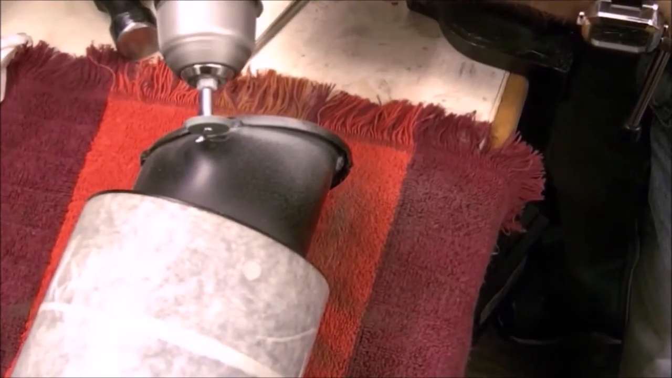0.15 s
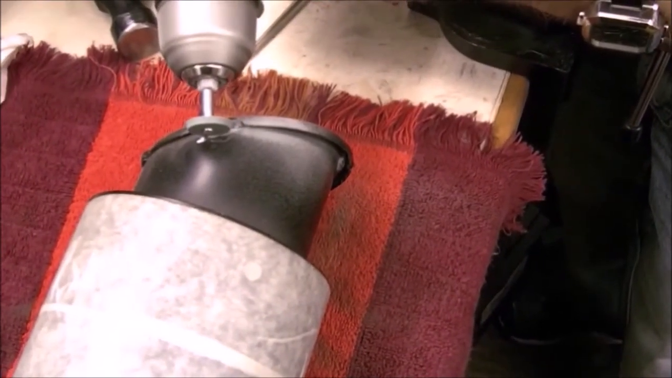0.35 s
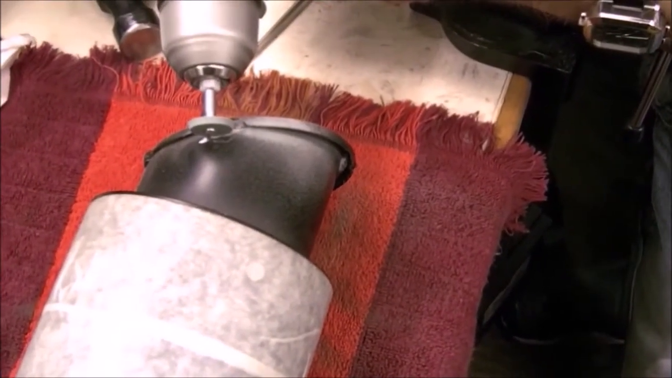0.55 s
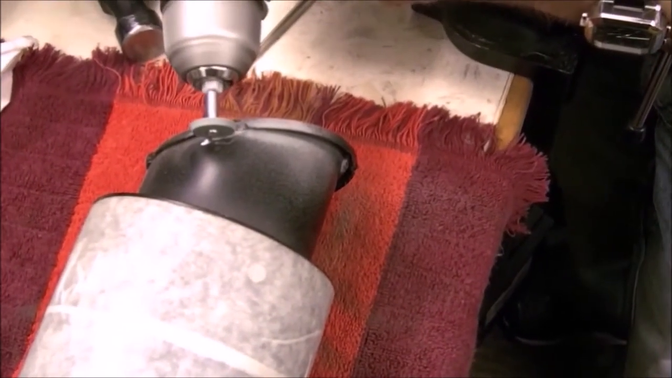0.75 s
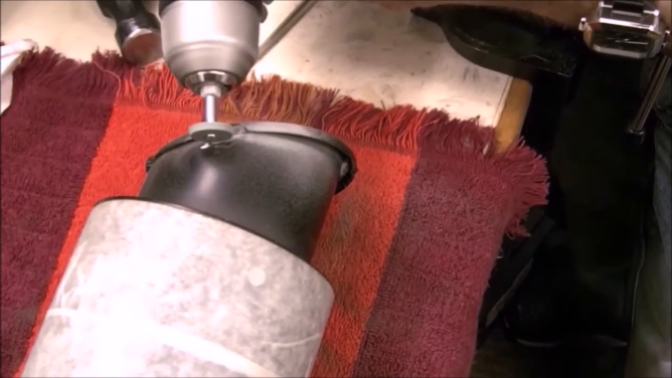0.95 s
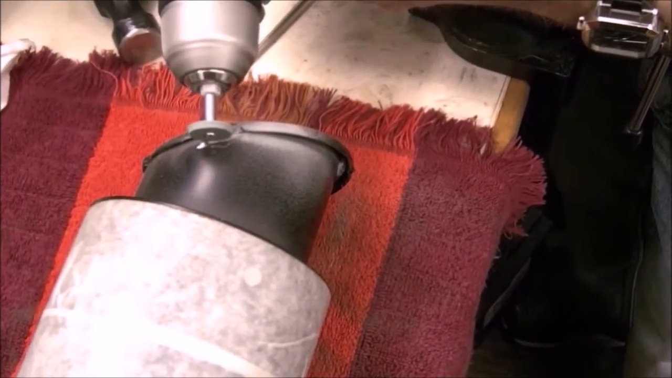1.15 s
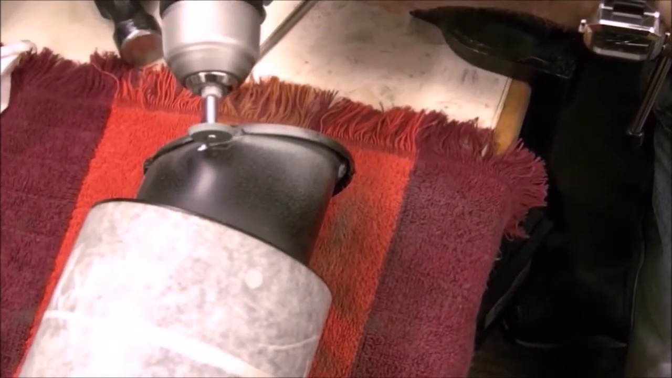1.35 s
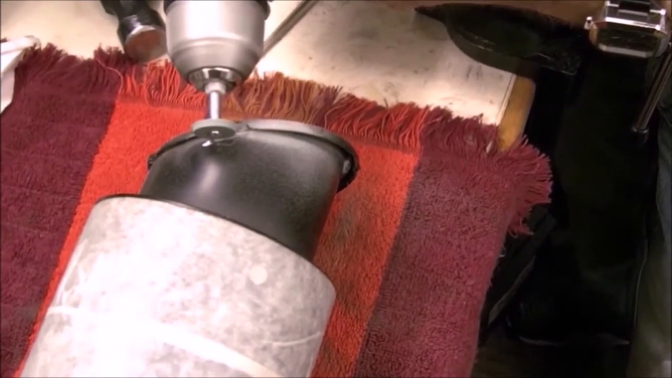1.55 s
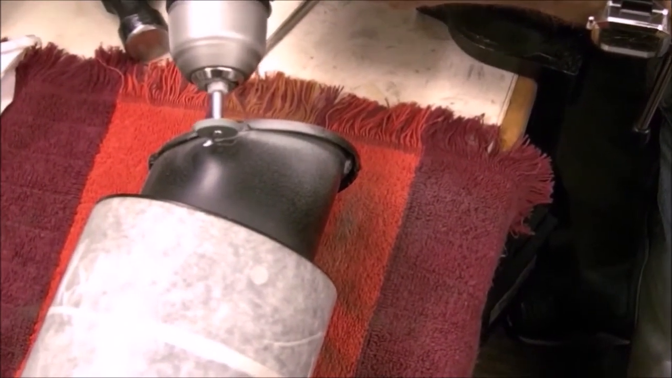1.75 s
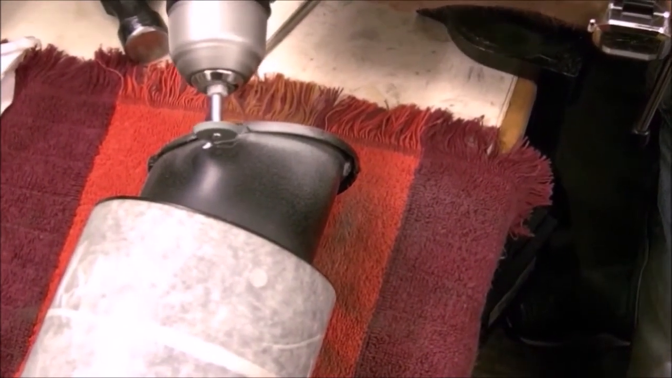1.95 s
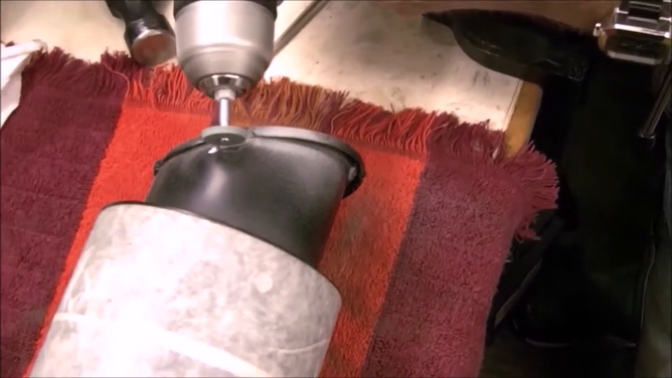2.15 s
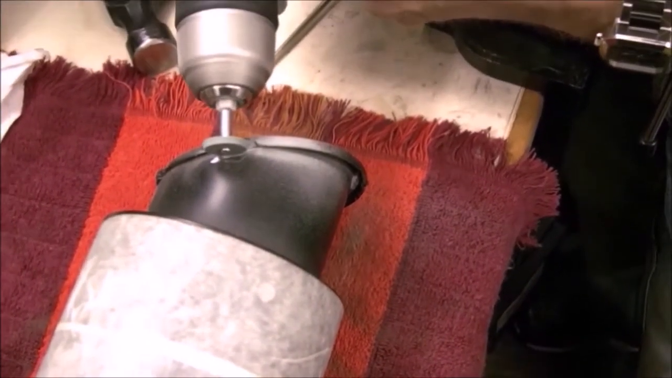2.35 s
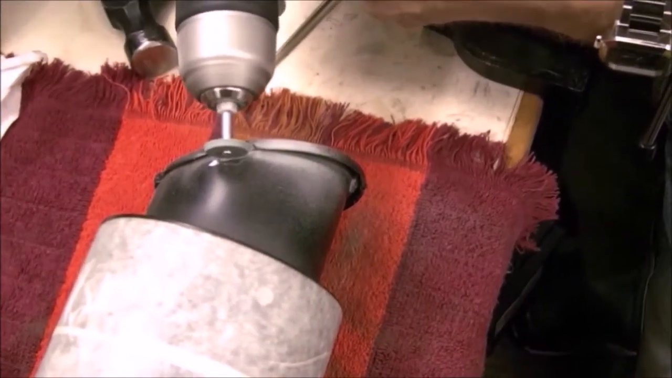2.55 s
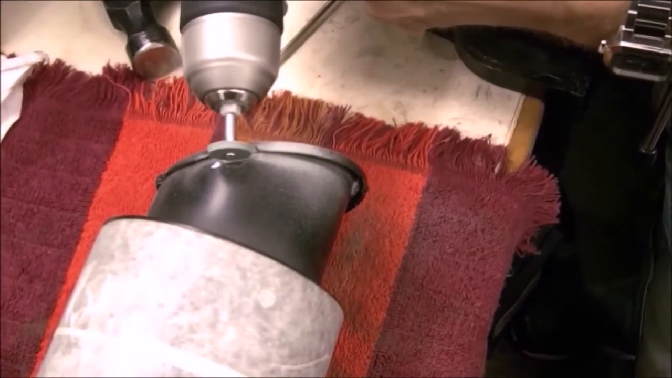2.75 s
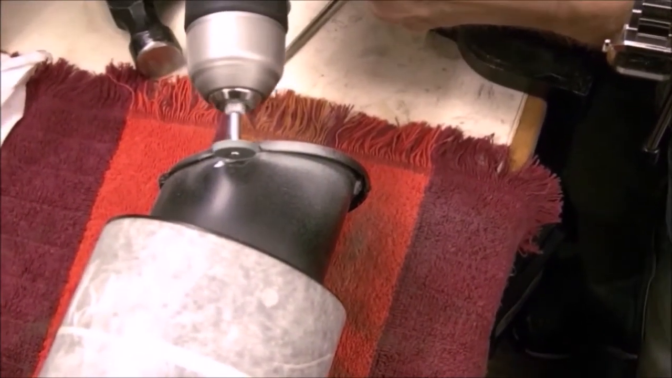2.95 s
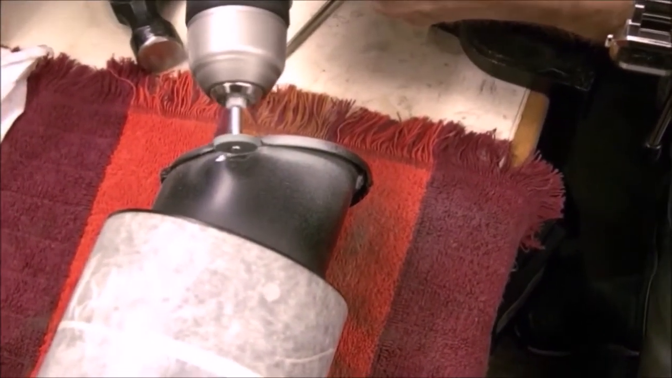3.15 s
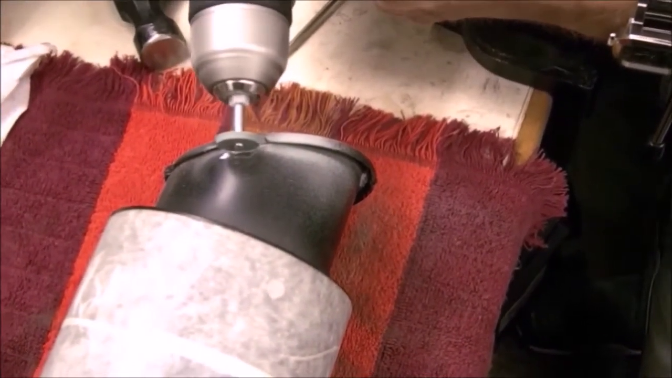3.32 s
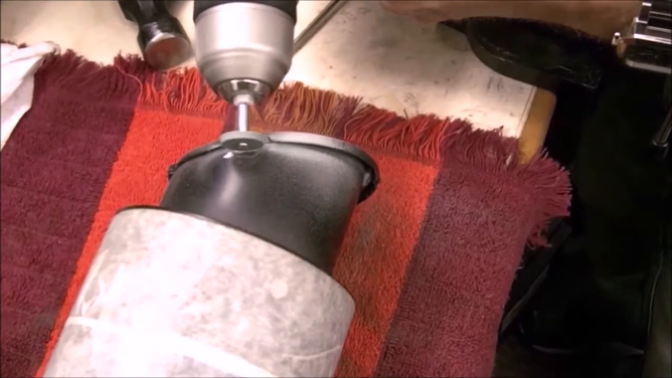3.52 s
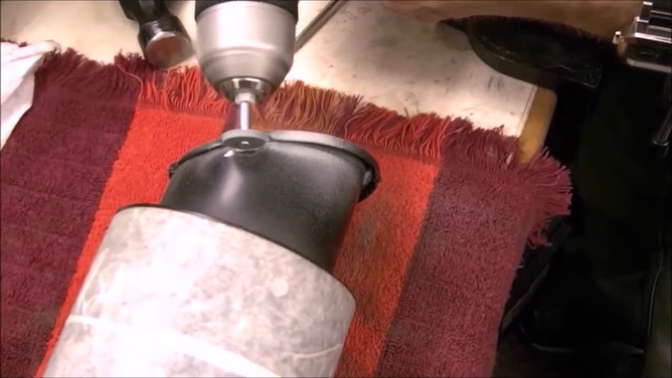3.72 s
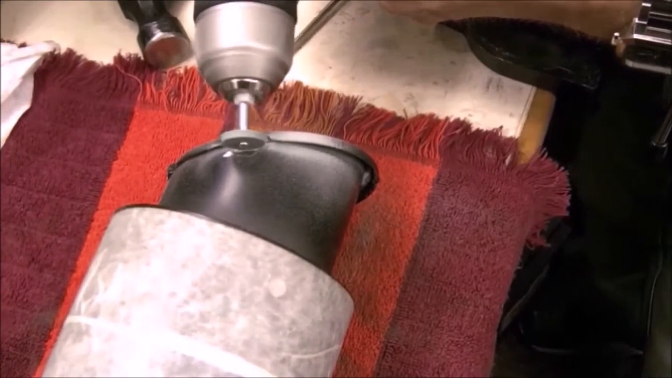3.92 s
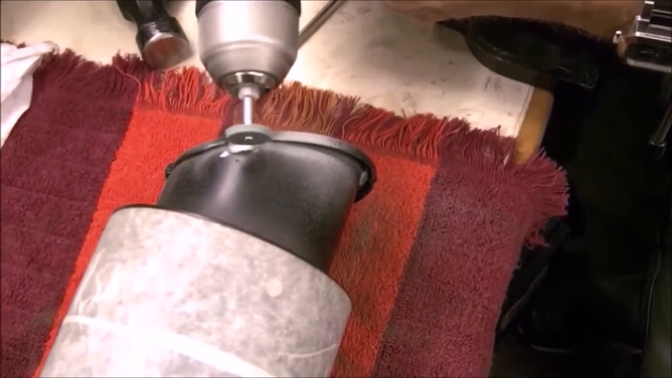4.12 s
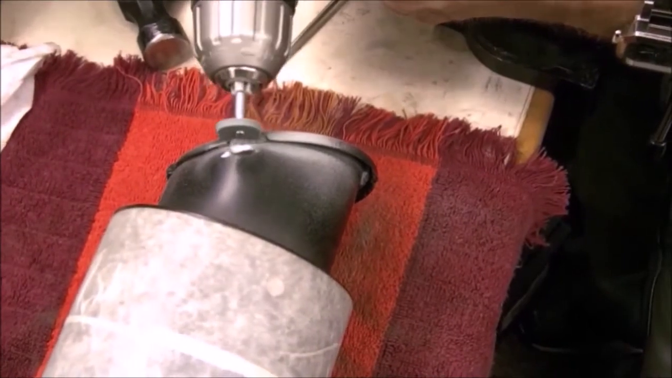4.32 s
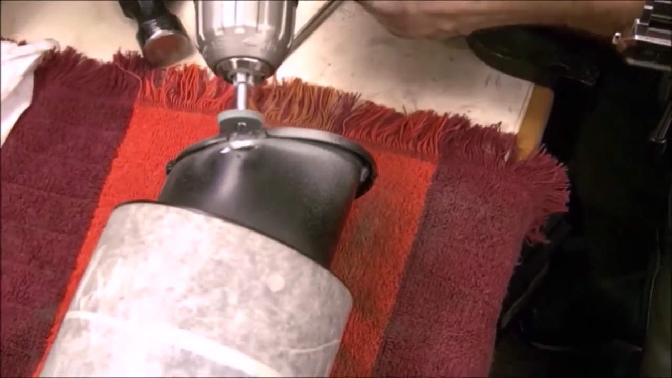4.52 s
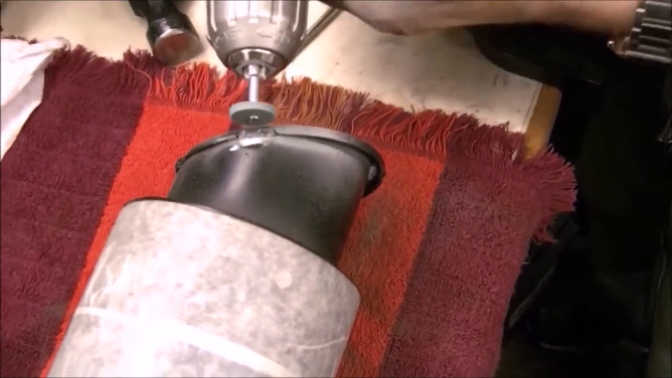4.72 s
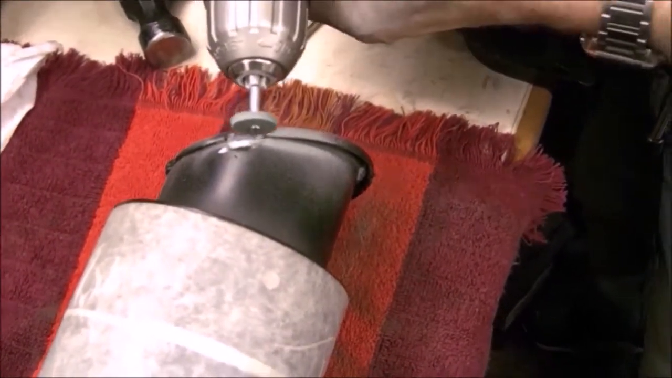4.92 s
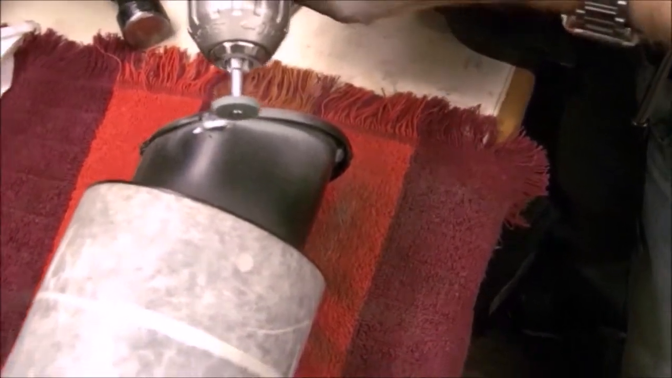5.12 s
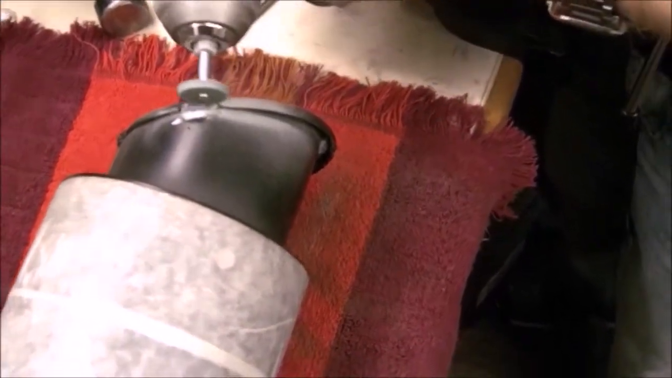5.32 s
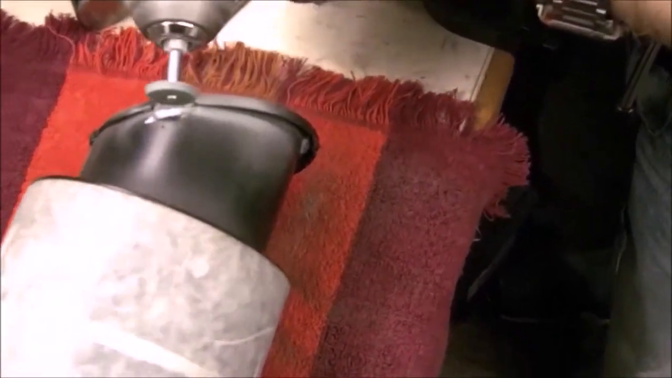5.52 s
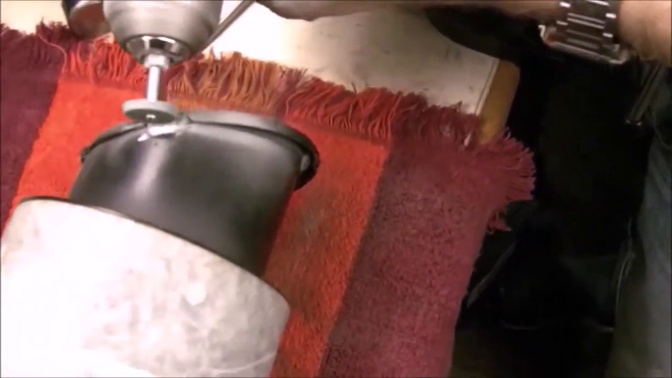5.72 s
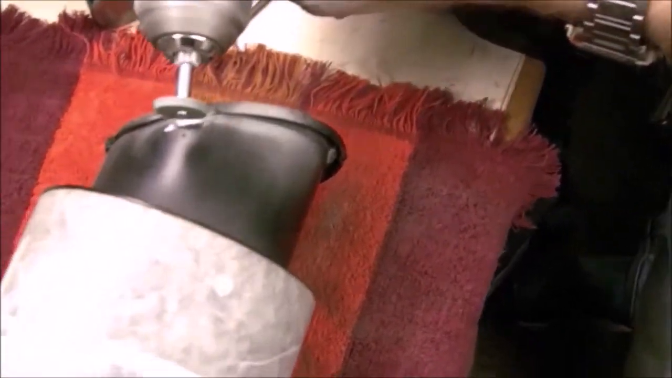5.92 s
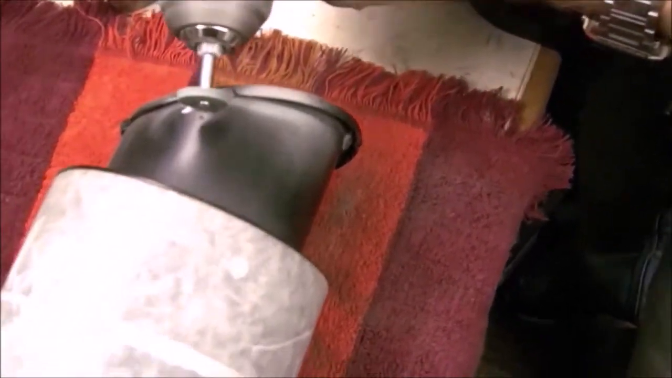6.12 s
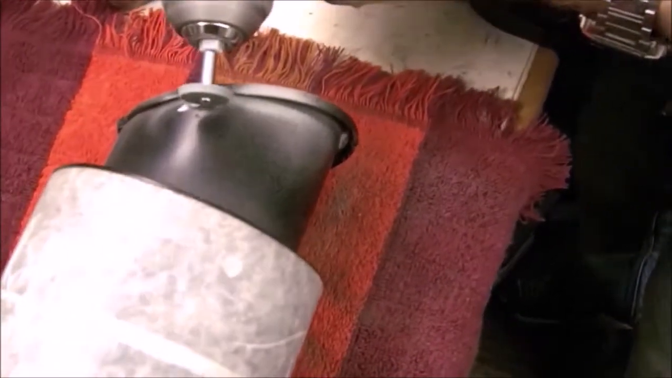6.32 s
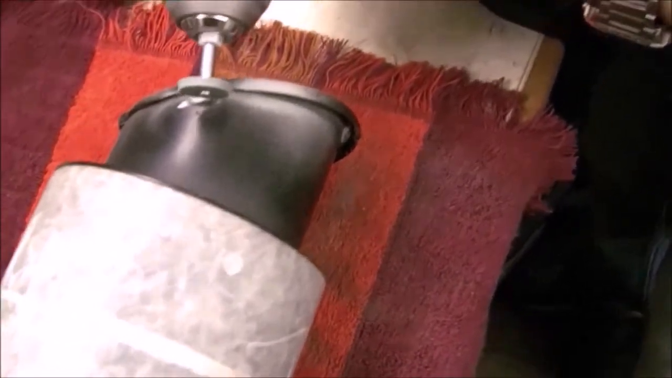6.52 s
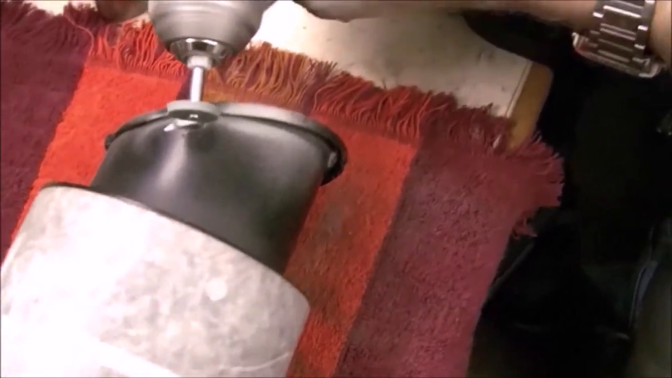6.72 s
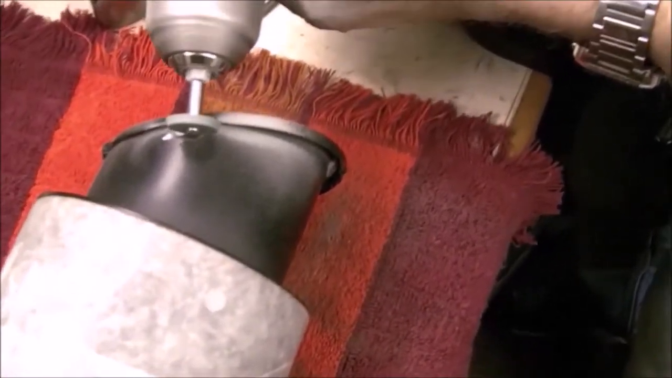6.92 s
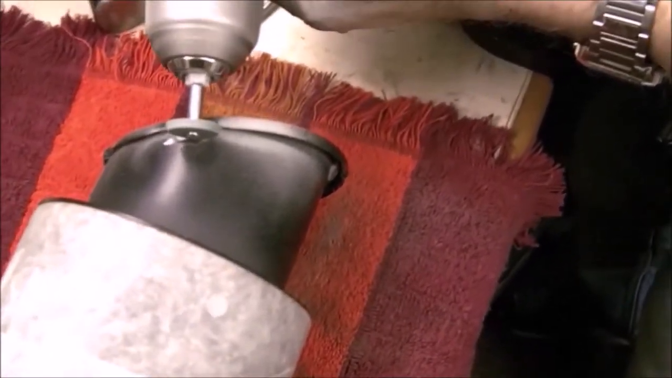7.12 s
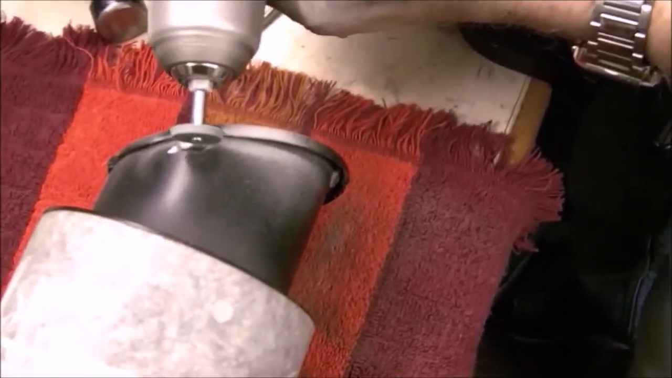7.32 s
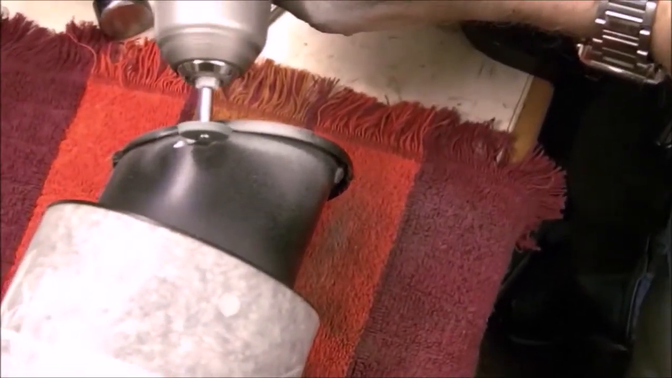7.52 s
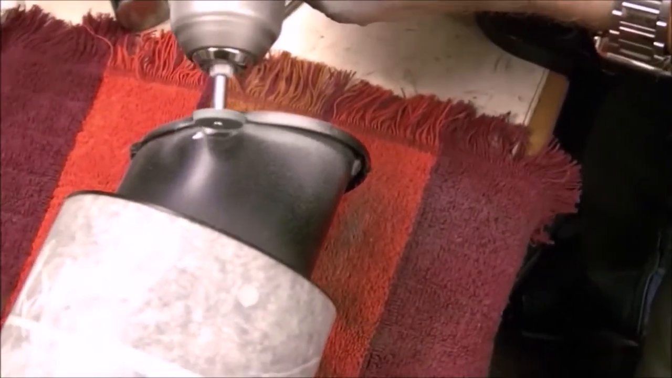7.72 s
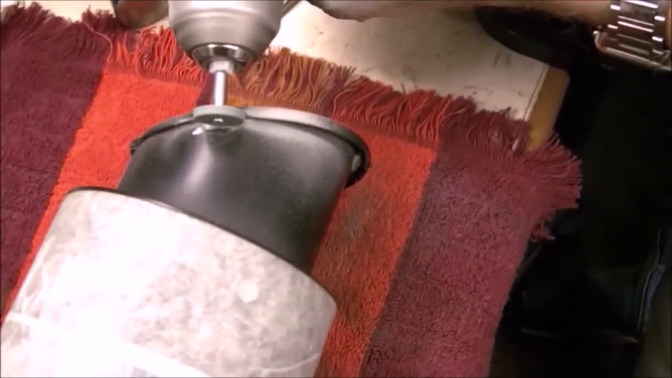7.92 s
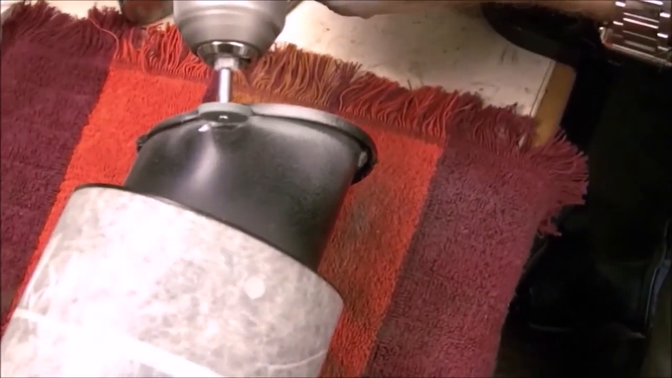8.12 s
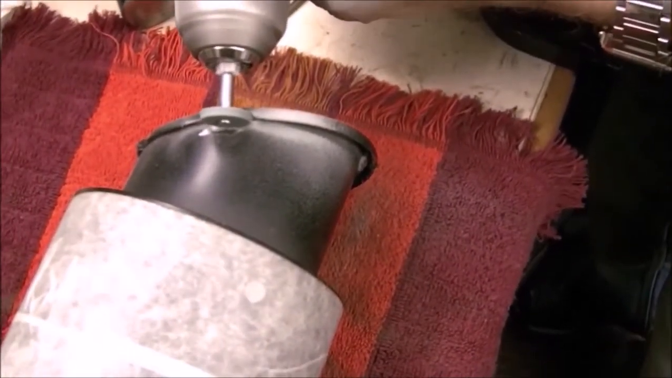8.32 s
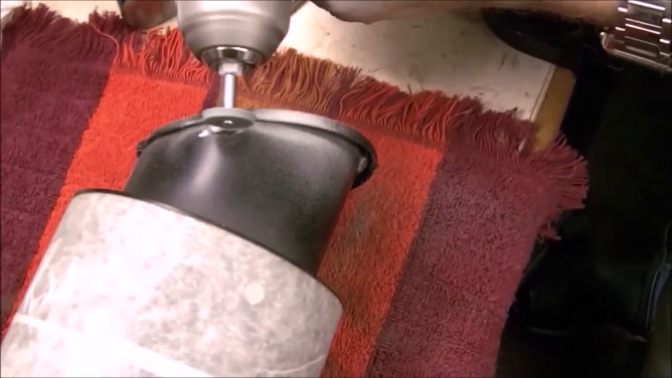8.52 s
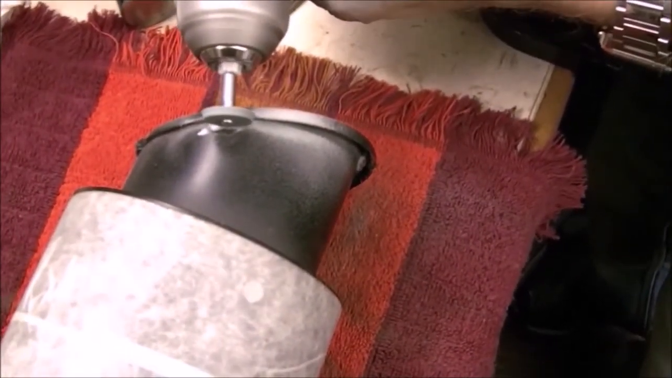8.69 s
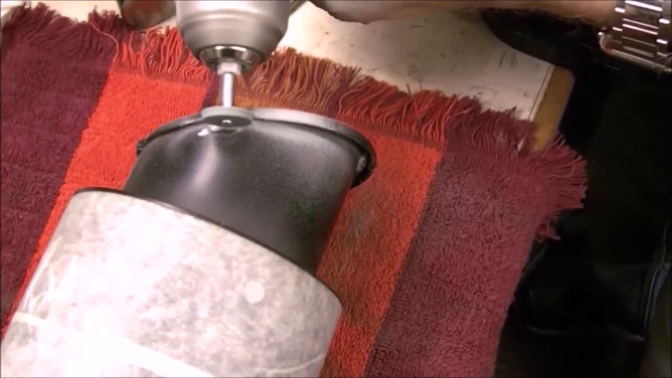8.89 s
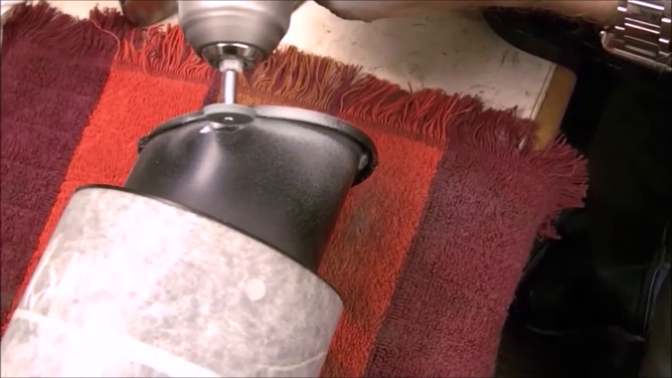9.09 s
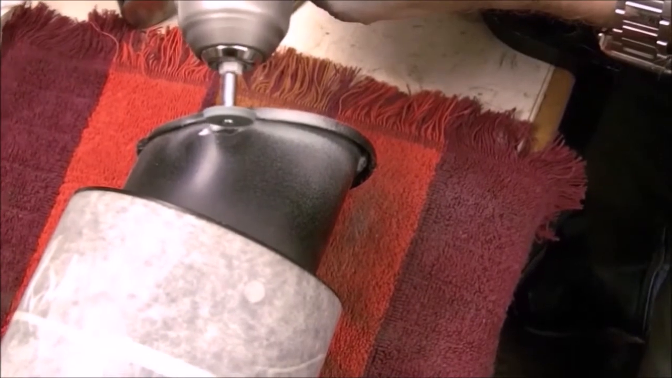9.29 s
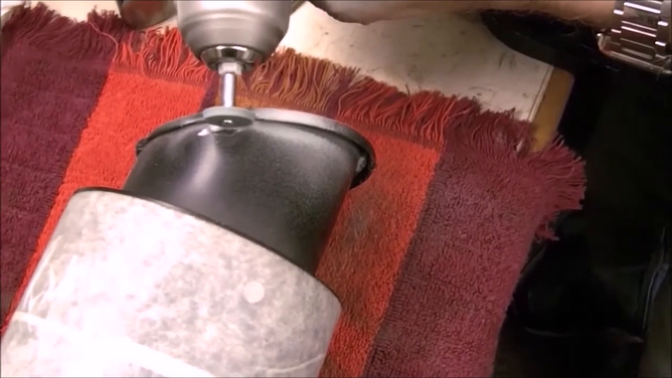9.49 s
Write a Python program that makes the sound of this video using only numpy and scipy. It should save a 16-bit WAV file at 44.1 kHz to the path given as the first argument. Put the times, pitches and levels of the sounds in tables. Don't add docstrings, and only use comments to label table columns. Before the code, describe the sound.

From 0 to 4 seconds a battery drill presses a small grinding wheel on a steel cap: dense gritty scraping, a bright metallic ring near 3 to 4 kHz fluttering about twenty times a second, uneven clanks, and underneath a nasal motor whine with gear rattle. At 4.0 the wheel lifts and the whine slides down, stopping with a small clack at 4.2. Until 5.1 there is only low room hush, a thin far appliance whine and faint handling ticks. At 5.15 a tiny chirp and gear knock lead into a very quick run-up; the drill spins freely, humming and rattling, much quieter than the grinding. Around 7.2 isolated sharp bites ring out, from 7.45 they become a regular hard, separate chatter, and after 7.9 grit fills in, growing heavier and harsher to the end at about 9.5. Close, dry, slightly left-leaning sound.

```python
import sys
import numpy as np
from scipy import signal
from scipy.fft import rfft, irfft, next_fast_len
from scipy.io import wavfile
from scipy.ndimage import uniform_filter1d

SR = 44100
rng = np.random.default_rng(int(sys.argv[2]) if len(sys.argv) > 2 else 0)


def int16_out(signal):
    q = np.round(np.clip(np.atleast_2d(signal).T, -1, 1) * 32767)
    wavfile.write(sys.argv[1], SR, q.astype(np.int16))


def voltage_ratio(decibels):
    exponent = np.asarray(decibels, float) / 20
    return 10 ** exponent


N = 421155

SIZE = next_fast_len(N + SR // 2)
HZ = np.maximum(np.fft.rfftfreq(SIZE, 1 / SR), 1)
T = np.arange(N) / SR
RELEASE_S, LOCK_S, START_S = 3.988, 4.197, 5.143
STEADY_SHARE = .025

# (first bite [s], turn [s], turns, timing scatter [s])
PASSES = [
    (.0291, .0506, 79, .009),
    (7.456, .0494, 27, .003),
    (8.796, .0506, 15, .003),
]


def grinding():
    # (time [s], arc length against light touch, share left between bites [0-1])
    contact_arc = [
        (0, 1.3, .5),
        (4, 1.3, .5),
        (7.1, .8, .15),
        (7.8, 1.1, .1),
        (8.5, 1.28, .14),
        (9.55, 1.5, .35),
    ]
    # (time [s], pressure as grit level [dB], cap ring level [dB])
    pressure = [(0, -37.5, -23), (.6, -38.5, -29.5), (1.35, -37.5, -29.5), (2.5, -37, -27), (3.0, -37, -27),
                (3.23, -36.5, -24.5), (3.8, -37.5, -26.5), (3.96, -38, -29), (4.04, -44.5, -39),
                (4.07, -90.5, -94), (7.2, -53, -96), (7.3, -55, -48), (7.74, -45, -34), (7.89, -40.5, -30),
                (7.98, -40, -22), (8.6, -38.5, -20.5), (9.15, -37.5, -17), (9.55, -35, -17)]
    arc, between = in_time(contact_arc)
    grit_db, rim_db = in_time(pressure)
    bite_ring, swell = biting(arc)
    rung = bite_ring + shell_knocks() + cap_ring(arc, rubbing(arc, between), grit_db, rim_db)
    return scraping(grit_db, swell), rung


def biting(arc):
    rise_s, crack_hz, crack_db, ease_s = .0013, 7100, -21.5, .0053
    rung, marks = np.zeros((2, N))
    for s, db, hz in bites():
        at = round(s * SR)
        long = arc[at]
        t60_s, struck_db = (.034, -16) if s > START_S else (.016, -5.5)
        add(rung, s, db - 7.5, hz, 300, rise_s * long ** 2, t60_s * long)
        marks[at] = np.sqrt(voltage_ratio(db + 8.0))
        strike(rung, s, db + struck_db, hz, 0.0008, t60_s * long)
        add(rung, s, db + crack_db, crack_hz, 2500, .0004, .02)
    fade = np.exp(-1 / (ease_s * SR))
    swell = signal.lfilter([np.e * (1 - fade)], [1, -2 * fade, fade ** 2], marks)
    return rung, swell


def bites():
    # (time [s], peak level [dB], ring [Hz])
    hard_bites = [(7.1648, -10, 3520), (7.2084, -12, 3650), (7.2547, -12.5, 3900), (7.4208, -16, 3620),
                  (7.456, -12, 3990), (7.505, -6.5, 3910), (7.555, -10, 3980), (7.6166, -16, 3920),
                  (7.6566, -12, 3540), (7.709, -16, 3920), (7.7556, -4.5, 4100), (7.814, -12, 3590),
                  (7.856, -5, 4000)]
    first_bites = [(0.037, -20, 4200), (0.0648, -26, 3900), (0.0907, -22, 4050), (0.1131, -22, 3900),
                   (0.1625, -24, 3710), (0.189, -15, 3820), (0.2174, -21, 3860), (0.2688, -22, 3480),
                   (0.3237, -19, 3890), (0.423, -19, 3930), (0.448, -23, 4090), (0.4783, -22, 3900),
                   (0.4967, -20, 3960), (0.5277, -19, 3490), (0.6045, -16, 3460), (0.632, -16, 3680),
                   (0.6789, -32, 3940), (0.7098, -25, 3730), (0.7327, -27, 4210), (0.7552, -28, 3220),
                   (0.7846, -25, 3550), (0.8036, -23, 3960), (0.8405, -26, 3500), (0.8654, -24, 3550),
                   (0.9053, -15, 3450), (0.932, -21, 3930), (1.0091, -24, 4080), (1.044, -20, 3930),
                   (1.0894, -18, 3900), (1.1413, -24, 3880), (1.1628, -18, 4000), (1.2062, -25, 3510),
                   (1.2386, -20, 3530), (1.2945, -26, 4120), (1.3423, -25, 3710), (1.3598, -23, 4090),
                   (1.3972, -30, 3500), (1.4132, -20, 3570), (1.4526, -18, 3750), (1.5145, -24, 4170),
                   (1.6467, -18, 3940), (1.7175, -21, 3390), (1.7724, -21, 3900), (1.8033, -17, 4100),
                   (1.8527, -23, 3680), (1.8831, -27, 3630), (1.8976, -26, 3970), (1.935, -31, 4100),
                   (1.9614, -19, 4080), (2.0058, -25, 3930), (2.0223, -25, 3380)]
    middle_bites = [(2.0059, -31, 3930), (2.0223, -30, 3380), (2.0528, -25, 4160), (2.1071, -24, 3750),
                    (2.1391, -31, 3730), (2.156, -23, 3870), (2.3092, -25, 3700), (2.366, -23, 3920),
                    (2.407, -24, 3700), (2.4349, -27, 4100), (2.4683, -22, 3380), (2.5057, -21, 3860),
                    (2.5601, -21, 3940), (2.584, -21, 4100), (2.6145, -22, 3960), (2.6873, -17, 3450),
                    (2.814, -20, 3560), (2.8624, -23, 3680), (2.9118, -32, 3930), (2.9617, -26, 4050),
                    (2.9796, -17, 4090), (3.0146, -17, 4100), (3.0375, -25, 4180), (3.0655, -19, 3700),
                    (3.0919, -17, 3360), (3.1148, -19, 4000), (3.1453, -17, 3920), (3.1667, -20, 3610),
                    (3.2186, -21, 3630), (3.2406, -19, 3480), (3.2705, -23, 4130), (3.2909, -16, 4090),
                    (3.3423, -18.5, 3430), (3.3678, -23, 3700), (3.4067, -26, 3640), (3.473, -18, 3720),
                    (3.5229, -26, 3920), (3.5743, -22, 3800), (3.6242, -22, 4090), (3.6801, -27, 3730),
                    (3.702, -23, 3410), (3.7255, -22, 3470), (3.7474, -23, 3420), (3.7753, -14, 3860),
                    (3.8257, -20, 3980), (3.8542, -22, 3400), (3.8781, -16, 4130), (3.9365, -23, 3570),
                    (3.9834, -22, 4090)]
    last_bites = [(7.9056, -13, 3430), (7.945, -21, 3720), (8.0057, -16.5, 3990), (8.0516, -13, 3980),
                  (8.1019, -18, 3450), (8.1559, -20, 3470), (8.2011, -15, 3580), (8.246, -15, 3990),
                  (8.2964, -19, 3700), (8.3467, -19, 3830), (8.3972, -25, 3370), (8.44, -24, 4020),
                  (8.5099, -14, 3600), (8.546, -23, 3900), (8.5585, -17, 4220), (8.6106, -16, 4280),
                  (9.3658, -27, 3980), (8.5957, -25, 4030), (8.648, -13, 3370), (8.709, -16, 4100),
                  (8.7434, -34, 3730), (8.8107, -17, 3900), (8.846, -16, 3940), (8.897, -24, 3860),
                  (8.944, -17, 3900), (9.0039, -22, 3590), (9.06, -8, 3460), (9.1088, -16.5, 3510),
                  (9.153, -23, 3920), (9.2116, -17, 3430), (9.2617, -21, 3900), (9.3488, -26, 3610),
                  (9.4153, -23, 3680), (9.4465, -33, 3780)]
    # (mean peak level [dB], scatter [dB])
    pass_db = [
        (-25, 7),
        (-12, 2),
        (-21, 3),
    ]
    ring_hz = (3280, 4100)
    rows = list(hard_bites)
    for listed, drive_db in ((first_bites, 2.5), (middle_bites, 2.5), (last_bites, 7)):
        rows += [(s, db + drive_db, hz) for s, db, hz in listed]
    listed_s = np.array(rows)[:, 0]
    for (first_s, turn_s, turns, scatter_s), (db, scatter_db) in zip(PASSES, pass_db):
        turns = int(turns)
        late, strong, high = rng.uniform(-1.6, 1, (turns, 3)).T * np.sqrt(3)
        due = first_s + turn_s * np.arange(turns)
        free = np.abs(due[:, None] - listed_s).min(axis=1) > turn_s / 2
        hz = np.interp(high, [-np.sqrt(3), np.sqrt(3)], ring_hz)
        rows += list(np.c_[due + scatter_s * late, db + scatter_db * strong, hz][free])
    return rows


def rubbing(arc, between):
    lead_s, contact_s, edge_s = .002, .016, .005
    rubs = np.zeros(N)
    for first_s, turn_s, turns, _ in PASSES:
        for s in first_s + turn_s * np.arange(turns):
            long = arc[round(s * SR)]
            rubs[round((s - lead_s * long) * SR):round((s + contact_s * long ** 2) * SR)] = 1
    return between + (1 - between) * uniform_filter1d(rubs, size=int(edge_s * SR))


def scraping(grit_db, swell):
    # (frequency [Hz], level [dB per Hz])
    grit_spectrum = [(40, -31), (110, -28), (160, -19), (400, -17.5), (580, -5), (1260, -17), (1650, -0.5),
                     (1830, -27), (2230, -8), (4040, -2), (6630, -16), (8500, -17), (12000, -23.5),
                     (16000, -23.5)]
    # (frequency [Hz], width [Hz], level [dB])
    cap_modes = [(154, 55, 6), (696, 42, -4.5), (1021, 25, 12), (1150, 47, 10.5), (1360, 52, -3),
                 (2256, 88, 6.5), (2722, 59, 6), (4420, 180, -4.5), (5410, 87, 6.5), (6190, 110, 9),
                 (7300, 250, 8), (7800, 250, -11), (8330, 200, 8.5), (8940, 110, 7)]
    thud_hz, lumps_db = 260, 3.5
    grit = grains(per_s=12000, spread_db=2.5) * voltage_ratio(2.5 * np.tanh(drift(57) / 2))
    force = voltage_ratio(grit_db + 4.0) * (1 + 0.024 * swell) + voltage_ratio(-36.0) * swell
    scrape = colour(grit, grit_spectrum, cap_modes) * force
    thud = signal.sosfilt(signal.butter(2, thud_hz, fs=SR, output="sos"), scrape)
    return scrape + thud * (voltage_ratio(lumps_db * drift(9.2) - 1.5) - 1)


def cap_ring(arc, touch, grit_db, rim_db):
    # (frequency [Hz], width [Hz], level [dB])
    rim_modes = [(3335, 150, -0.5), (3590, 390, 2), (3850, 150, -0.5), (3920, 116, -2.5), (4090, 106, 3.5),
                 (4690, 220, -7), (6880, 194, -7.5), (7560, 167, -9)]
    shell_modes = [
        (1510, 21, 15.5),
        (1610, 54, 8.5),
    ]
    low_modes = [
        (947, 46, -9),
        (1150, 30, -2.5),
        (1360, 65, -8.5),
        (2255, 63, -4.5),
    ]
    chatter = grains(per_s=9000, spread_db=2.0)
    rim = voltage_ratio(rim_db - 8.5) * touch * rings(chatter, rim_modes, flicker_db=3.2, rate_hz=80)
    shell_db = rim_db + 11 * np.maximum(arc - 1.3, 0) + by_run(-16, -18.5)
    shell = voltage_ratio(shell_db) * np.sqrt(touch) * 1.2 * rings(chatter, shell_modes, flicker_db=3.5, rate_hz=90)
    low = voltage_ratio(grit_db - 2.0) * rings(chatter, low_modes, flicker_db=6.5, rate_hz=23)
    return rim + shell + low


def shell_knocks():
    # (time [s], peak level [dB], ring [Hz])
    clangs = [(0.2433, -23.5, 1150), (0.413, -22.5, 1636), (0.515, -20, 1640), (0.619, -19, 1610),
              (0.824, -23, 1580), (0.924, -19.5, 1630), (0.985, -22, 1510), (0.854, -29, 1150),
              (1.435, -16.5, 1675), (1.974, -29, 1360), (2.201, -22, 1514), (2.4842, -25, 1150),
              (2.678, -27, 1164), (2.988, -20, 1150), (3.44, -24, 1620), (3.543, -20.5, 1510),
              (3.59, -23, 1150), (3.754, -22.5, 1360), (3.798, -29, 1150), (3.996, -24, 2330),
              (2.602, -30, 1590), (2.63, -25, 1660), (7.664, -24, 1590), (7.905, -26.5, 627),
              (7.7093, -29, 1430), (7.774, -18, 1510), (7.8131, -24, 1620), (8.168, -22.5, 1610),
              (8.5135, -27, 1470), (8.8652, -29, 1510), (8.9476, -31, 1610), (8.446, -23.5, 1610),
              (9.282, -25, 1510), (9.335, -24, 1610)]
    out = np.zeros(N)
    for s, db, hz in clangs:
        add(out, s - .004, db, hz, 70, .002, .05)
        strike(out, s - .004, db + 2.0, hz, 0.0031, 0.053)
        add(out, s - .002, db - 2.5, hz, 350, .0007, .012)
    return out


def motor():
    # (time [s], full rotor speed [Hz], once-a-turn hum level [dB], magnet whine level [dB])
    running = [(0, 337, -48.5, -38.5), (.6, 339.5, -48, -38), (1.3, 338.7, -46.5, -39),
               (2, 341.2, -46.5, -38.5), (2.7, 341.6, -46, -40.5), (4, 341.2, -48.5, -39),
               (5.27, 339.6, -47.5, -33.5), (5.45, 340.4, -45, -34.5), (5.65, 341.6, -44.5, -42.5),
               (6, 343.2, -42.5, -43.5), (6.5, 341.5, -42.5, -43), (6.9, 344, -41, -45),
               (7.3, 345.1, -48.5, -42.5), (8, 340.8, -52, -43), (8.5, 342.4, -48, -45),
               (9.55, 343, -51, -37)]
    full_hz, hum_db, whine_db = in_time(running)
    share = speed_share()
    rotor_hz = full_hz * share
    turn = 2 * np.pi * np.cumsum(rotor_hz) / SR
    rattle_db = rattle_level(share)
    low = low_orders(share, rotor_hz, turn, hum_db, whine_db)
    tones = np.sqrt(2) * (low + voltage_ratio(rattle_db) * upper_orders(share, turn))
    return tones + switch_chirp(), voltage_ratio(rattle_db) * gear_rattle(turn)


def speed_share():
    coast_per_s, brake_s, brake_per_s, run_up_s = 1.88, 4.171, 11.0, .038
    lost = coast_per_s * np.maximum(T - RELEASE_S, 0)
    lost += (brake_per_s - coast_per_s) * np.maximum(T - brake_s, 0)
    run_up = 1 - np.exp((START_S - T) / run_up_s)
    return np.maximum(np.where(T < START_S, 1 - lost, run_up), 1e-3)


def low_orders(share, rotor_hz, turn, hum_db, whine_db):
    # (whine frequency [Hz], level through the housing [dB])
    whine_path = [
        (300, -33),
        (690, 5.5),
        (1000, -7),
        (1150, 4),
        (1260, -10),
        (1530, -1.5),
        (1640, 0.5),
        (1800, -3.5),
    ]
    biting_s, slower = 7.25, np.log10(share)
    again = T > START_S
    coasting = (T > RELEASE_S) & ~again

    flicker_db = np.where(T > biting_s, 4.5, 2)
    hum = voltage_ratio(hum_db + 148 * slower + flicker_db * drift(22)) * np.sin(turn)

    peak_hz, width_hz, peak_db = 565, 95, 22
    second_db = by_run(-50, -48) + 108 * slower
    second_db += coasting * peak_db / (1 + (2 * (2 * rotor_hz - peak_hz) / width_hz) ** 2)
    second = voltage_ratio(second_db + 3.44 * drift(25)) * np.sin(2 * turn)

    unpowered_db, unpowered_s = -7, .045
    whine_db = whine_db + unpowered_db * np.exp(-np.maximum(T - RELEASE_S, 0) / unpowered_s) * coasting
    path_hz, path_db = np.transpose(whine_path)
    whine_db += np.interp(5 * rotor_hz, [0, *path_hz], [-60, *path_db])
    dip_share, dip_width, dip_db = .88, .072, -20
    whine_db += again * dip_db * np.exp(-((share - dip_share) / dip_width) ** 2)
    whine = voltage_ratio(whine_db + 0.6 * drift(34)) * np.sin(5 * turn + 0.085 * drift(25))
    return hum + second + whine


def upper_orders(share, turn):
    # (multiple of the rotor, level against the rattle [dB])
    upper_lines = [(3, -21), (6, -21), (10, -11), (12, -14.5), (15, -10.5), (21, -18.5), (22, -33),
                   (24, -27), (25, -21), (27, -25), (29, -27), (30, -24), (31, -24.5), (32, -39.5)]
    hard_pull_share, hard_pull_db, glide_top_order, glide_loss_db = .78, 6, 12, -16
    gliding = np.tanh((1 - share) / STEADY_SHARE)
    clear_db = by_run(-7, -3.5)
    clear_db = clear_db - by_run(1, 10) * gliding * np.clip((share - hard_pull_share) / 0.16, 0, 1)
    clear_db += (T > START_S) * hard_pull_db * np.clip((hard_pull_share + .1 - share) / .1, 0, 1)
    flutter, wander = 0.035 * drift(44), voltage_ratio(1.9 * drift(25))
    lines = np.zeros(N)
    for order, db in upper_lines:
        k = int(round(order))
        level = voltage_ratio(db + glide_loss_db * gliding * (k > glide_top_order)) * np.roll(wander, 999 * k)
        lines += level * np.sin(k * (turn + flutter) + k * k)
    return voltage_ratio(clear_db) * lines


def rattle_level(share):
    # (time [s], level on the rattle [dB], width [s])
    jolts = [
        (4.11, -0.5, 0.079),
        (4.188, 5.5, 0.011),
        (5.166, 6.5, 0.013),
        (5.2, -1, .012),
    ]
    knee_share, engage_db, engage_s, stop_db_per_s = 0.53, -19, .007, 420
    again = T > START_S
    level_db = by_run(-36.5, -34.5) - np.minimum(np.log10(share / knee_share), 0)
    level_db += sum(db * np.exp(-((T - s) / width_s) ** 2) for s, db, width_s in jolts)
    level_db += again * engage_db * np.exp(-np.abs(T - START_S) / engage_s)
    return level_db - stop_db_per_s * np.clip(T - LOCK_S, 0, .1) * ~again


def gear_rattle(turn):
    # (frequency [Hz], level [dB per Hz])
    rattle_spectrum = [(40, -47), (180, -38.5), (490, -20.5), (590, -3), (700, 0.5), (1300, -10.5),
                       (2000, -7.5), (3400, -8), (4350, -18.5), (5300, -14), (6200, -19.5), (10400, -22),
                       (12000, -30.5), (16000, -26)]
    # (frequency [Hz], width [Hz], level [dB])
    housing_modes = [
        (670, 260, -1.5),
        (965, 58, 7.5),
        (1101, 15, 7.5),
        (1790, 70, -4),
        (2080, 160, 7),
        (5230, 240, 6.5),
        (8360, 640, -2),
        (10200, 700, 2.5),
    ]
    mesh = grains(per_s=9000, spread_db=2.5) * (1 + 0.045 * np.cos(turn)) * voltage_ratio(1.08 * drift(26))
    return wobble(colour(mesh, rattle_spectrum, housing_modes), 7.96)


def switch_chirp():
    on_s, off_s, hz, level_db = 5.133, 5.158, 3900, -50
    return voltage_ratio(level_db) * np.sin(2 * np.pi * hz * T) * np.clip((T - on_s) / 0.01, 0, 1) * (T < off_s)


def handling():
    # (time [s], peak level [dB], ring [Hz], t60 [s])
    ticks = [(4.187, -40, 1800, .03), (4.184, -32, 4600, .025), (5.106, -50, 2200, 0.037),
             (5.7, -43, 1000, .03), (4.225, -40, 260, 0.12), (3.7, -48, 900, 0.1), (2.4, -33, 900, 0.15),
             (4.387, -45, 640, 0.057), (4.39, -57, 1910, 0.052), (4.478, -52, 410, 0.06),
             (4.589, -52, 1840, .06), (4.59, -54, 680, 0.071), (4.6, -66, 4700, .05),
             (4.737, -47, 600, 0.07), (4.75, -60, 4000, .05), (4.786, -51, 1300, 0.041),
             (6.4, -53, 4200, .04), (4.871, -48, 230, 0.048), (4.985, -52, 650, 0.045),
             (5.088, -54, 702, 0.039), (5.116, -50, 4500, .03), (5.113, -58, 7300, .03),
             (4.786, -62, 7400, .04), (4.86, -51, 3600, 0.059), (4.89, -64, 5400, .05)]
    # (time [s], peak level [dB], ring [Hz])
    kicks = [
        (5.156, -26, 1200),
        (5.162, -35, 674),
        (5.164, -28, 1800),
        (5.163, -25, 2950),
        (5.225, -36, 720),
    ]
    out = np.zeros(N)
    for s, db, hz, t60_s in ticks:
        add(out, s, db, hz, 0.31 * hz + 120, .0006, t60_s)
        strike(out, s, db - 11.0, hz, .0004, t60_s / 2)
    for s, db, hz in kicks:
        add(out, s, db + 6.5, hz, 90, .002, .04)
    return out


def air():
    # (frequency [Hz], level [dB])
    hush_spectrum = [(15, -53), (25, -27.5), (64, -8), (139, -9.5), (230, -8), (475, -4.5), (544, -3.5),
                     (770, -8), (2860, -26), (3270, -19), (3540, -31), (6560, -29), (15000, -32)]
    # (frequency [Hz], wander [Hz], level [dB])
    far_lines = [
        (3270, 13, -79),
        (3930, 14.3, -89),
        (6520, 18, -84),
        (7880, 24, -91),
        (9770, 30, -96),
    ]
    hush_db = -70
    whine = np.zeros(N)
    for hz, wander_hz, db in far_lines:
        phase = 2 * np.pi * np.cumsum(hz + wander_hz * drift(40)) / SR
        whine += voltage_ratio(db + 2.0 * drift(30)) * np.sqrt(2) * np.sin(phase)
    hush = voltage_ratio(hush_db + 5.0 + 1.8 * drift(9)) * colour(rng.standard_normal(N), hush_spectrum)
    return hush + whine * voltage_ratio(np.interp(T, (4.24, 4.33), [-12, -1.5]))


def echoes():
    t60_s, t = 0.11, T[:SR // 4]
    tail = rng.standard_normal(len(t)) * voltage_ratio(-60 * t / t60_s) * (t > .0015)
    return rfft(tail / np.sqrt(np.sum(tail ** 2)), SIZE)


def rms_one(x):
    return x / np.sqrt(np.mean(x ** 2) + 1e-20)


def in_time(rows):
    s, *columns = np.transpose(rows)
    return [np.interp(T, s, c) for c in columns]


def by_run(first, second):
    return np.where(T > START_S, float(second), float(first))


def at_hz(points):
    hz, level = np.transpose(points)
    return np.interp(np.log(HZ), np.log(hz), level)


def colour(x, spectrum, peaks=()):
    bells_db = sum(db / (1 + (2 * (HZ - hz) / width_hz) ** 2) for hz, width_hz, db in peaks)
    return rms_one(irfft(rfft(x, SIZE) * voltage_ratio(at_hz(spectrum) + bells_db), SIZE)[:N])


def drift(rate_hz):
    r = np.exp(-32 * np.pi * rate_hz / SR)
    slow = signal.lfilter([1], [1, -2 * r, r * r], rng.standard_normal(N // 16 + 3002))[3000:]
    return np.interp(np.arange(N) / 16, np.arange(len(slow)), rms_one(slow))


def resonate(x, hz, width_hz):
    r = np.exp(-np.pi * width_hz / SR)
    poles = [1, -2 * r * np.cos(2 * np.pi * hz / SR), r * r]
    return signal.lfilter(np.array([1, 0, -1]) * (1 - r * r) / 2, poles, x)


def rings(clicks, modes, flicker_db, rate_hz):
    out = np.zeros(N)
    for hz, width_hz, db in modes:
        level = voltage_ratio(db + 2 * flicker_db * np.tanh(drift(rate_hz) / 2))
        out += level * wobble(resonate(resonate(clicks, hz, 3 * width_hz), hz, width_hz), 12.0)
    return rms_one(out)


def wobble(x, rate_hz):
    shift_share = .012
    return np.interp(T + shift_share / (2 * np.pi * rate_hz) * drift(rate_hz), T, x)


def grains(per_s, spread_db):
    sizes = voltage_ratio(spread_db * np.minimum(rng.exponential(1, N), 5)) * rng.choice([-1, 1], N)
    return rms_one(sizes * (rng.random(N) < per_s / SR))


def add(out, s, db, hz, width_hz, rise_s, t60_s):
    t = T[:SR // 10]
    noise = resonate(rng.standard_normal(2 * len(t)), hz, width_hz)[len(t):]
    power = uniform_filter1d(noise ** 2, size=int(SR / width_hz))
    noise = rms_one(noise / np.sqrt(power + 1e-12) ** .7)
    shape = (1 - np.exp(-t / rise_s)) * voltage_ratio(-20 * t / t60_s - 98 * (t / t60_s) ** 2)
    at = round(s * SR)
    out[at:at + len(t)] += voltage_ratio(db) * resonate(noise * shape, hz, 2 * width_hz)[:N - at] / 2


def strike(out, s, db, hz, rise_s, t60_s):
    t = T[:SR // 10]
    shape = (1 - np.exp(-t / rise_s)) * voltage_ratio(-20 * t / t60_s - 107 * (t / t60_s) ** 2)
    at = round(s * SR)
    out[at:at + len(t)] += (voltage_ratio(db) * shape * np.sin(2 * np.pi * hz * t * (1 - .3 * t)))[:N - at]


def scene():
    # (frequency [Hz], side against mid level [dB])
    side_width = [
        (60, -23),
        (90, -22),
        (140, -13),
        (240, -26),
        (470, -16),
        (940, -17),
        (1860, -74),
        (3690, -15.5),
        (7340, -4.5),
        (14600, -1),
    ]
    # (frequency [Hz], left against right level [dB])
    left_lean = [
        (60, -1.5),
        (150, 1),
        (370, 0.7),
        (940, 0.6),
        (2340, 0.94),
        (5840, 1.5),
        (10000, 3.5),
        (14600, 0),
    ]
    room_db, sway_rad, sway_hz = -9, 3.0, 10
    tones, *sources = [rfft(x, SIZE) for x in (*motor(), *grinding(), handling() + air())]
    mid = tones + sum(near * (1 + voltage_ratio(room_db) * echoes()) for near in sources)
    lean = np.tanh(at_hz(left_lean) * np.log(10) / 40)
    spread = voltage_ratio(at_hz(side_width)) * sum(near * echoes() for near in [tones, *sources])
    mid, leaning, even, odd = irfft(np.array([mid, mid * lean, spread, 1j * spread]), SIZE)[:, :N]
    sway = sway_rad * drift(sway_hz)
    side = leaning + even * np.cos(sway) + odd * np.sin(sway)
    return np.array([mid + side, mid - side])


def band_limit(x):
    return signal.sosfilt(signal.butter(12, 15190, fs=SR, output="sos"), x)


def record(dry):
    cutoff_hz = 15650
    soft = .55 * np.tanh(dry / .55)
    cut = signal.sosfilt(signal.cheby2(12, 70, cutoff_hz, fs=SR, output="sos"), soft)
    return band_limit(cut)


dry = scene()
out = record(dry)
int16_out(out)
```